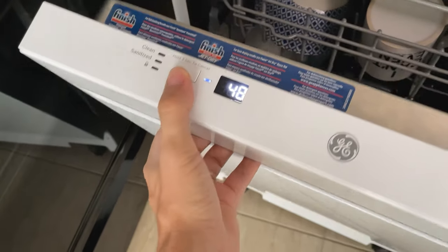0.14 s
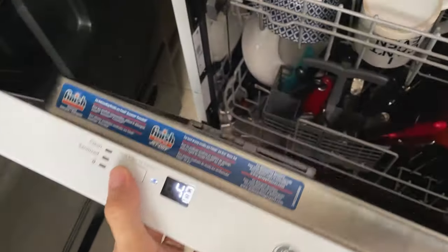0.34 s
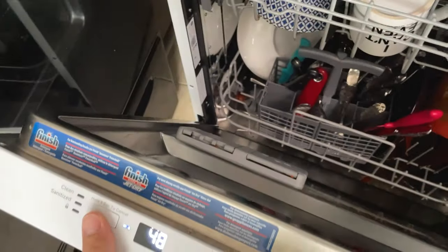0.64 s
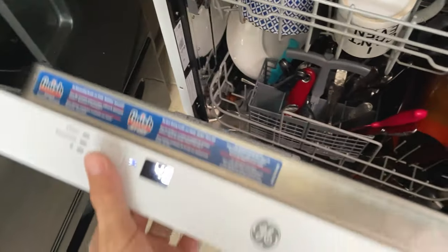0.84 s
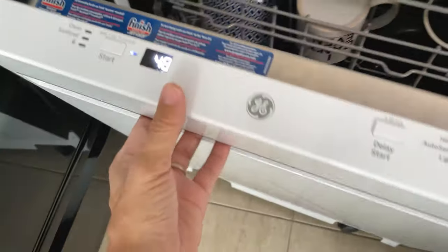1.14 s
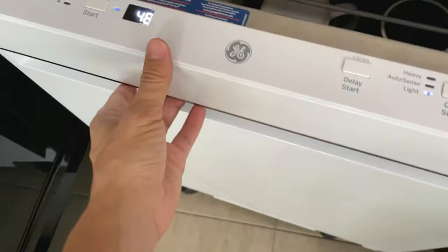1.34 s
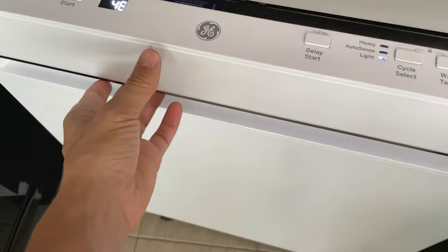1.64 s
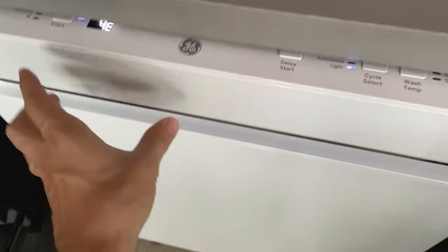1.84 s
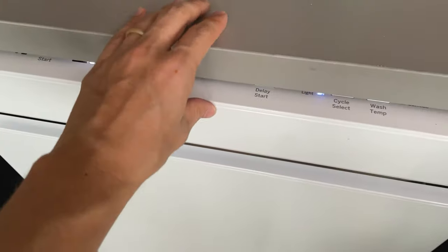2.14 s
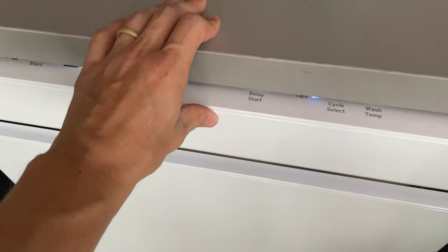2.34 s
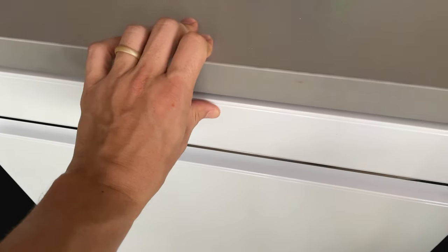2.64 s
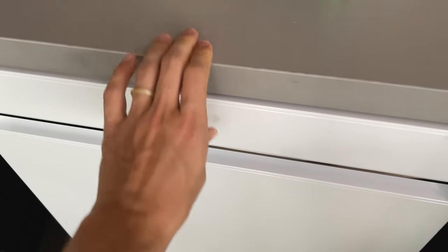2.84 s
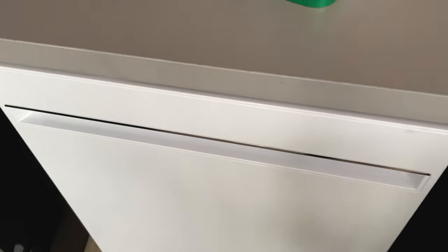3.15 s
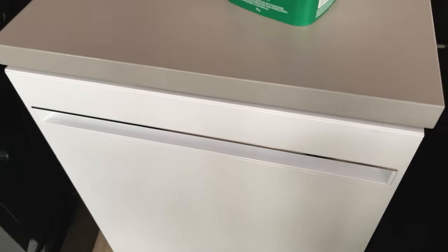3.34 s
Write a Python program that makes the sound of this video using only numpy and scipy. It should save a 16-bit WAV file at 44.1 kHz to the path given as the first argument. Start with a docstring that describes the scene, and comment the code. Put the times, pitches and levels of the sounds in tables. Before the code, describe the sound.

Loud thud and latch snap of a dishwasher door pushed shut, followed by three small clicks.

```python
"""A kitchen, close up on a dishwasher door being swung up and pushed shut.
Hinges and racks knock lightly, the springs groan, the door meets the tub and the seal squeaks.
Then the big hit: the latch snaps home, the steel panel rings and the whole cabinet rocks.
Three bright clicks follow. Under it all sits a bed of air, low rumble and appliance hum."""
import sys
import numpy as np
from scipy import signal
from scipy.fft import rfft, irfft
from scipy.io import wavfile
from scipy.ndimage import uniform_filter1d

SR = 44100
rng = np.random.default_rng(int(sys.argv[2]) if len(sys.argv) > 2 else 0)


def dump_mix(stems):
    """Bounce the given channels to the path in sys.argv[1] as a 16-bit WAV at rate SR."""
    frames = np.atleast_2d(stems).T  # one column per channel
    limited = np.clip(frames, -1, 1)  # hard clip at full scale
    pcm = np.round(limited * 32767).astype(np.int16)
    wavfile.write(sys.argv[1], SR, pcm)


N = 154350

# EQ curves of the room's air and low rumble (frequency [Hz], level [dB])
AIR_EQ = [(60, -3), (170, 1.5), (300, -7.5), (470, -4.5), (700, -13), (1000, -13.5), (1800, -27),
          (4000, -28), (10000, -26), (16000, -28)]
RUMBLE_EQ = [(10, -10), (27, 3.5), (40, 0.5), (55, -5.5), (72, -3), (95, -18.5), (130, -14.5), (170, -23.5),
             (300, -56.5)]
# appliance hum (frequency [Hz], level [dB])
HUM_TONES = [(73, -49.5), (131, -66)]
# hand and door brushing (centre time [s], half length [s], level [dB], band centre [Hz], width [octaves])
BRUSH_CUES = [(0.13, 0.052, -69.5, 3700, 0.96), (1.06, 0.11, -62, 9500, 1.1), (1.42, 0.056, -65, 3570, 2),
              (1.67, 0.11, -66, 4440, 1.7), (1.806, 0.023, -55.5, 6900, 4),
              (2.086, 0.033, -63.5, 9000, 2.5), (2.497, 0.018, -58.5, 9000, 0.76),
              (2.476, 0.085, -57, 790, 0.61), (3.18, 0.075, -55, 670, 0.4), (3.362, 0.11, -60, 9400, 6.5)]
# door knocks (time [s], crack level [dB], crack high cut [Hz], clatter level [dB])
KNOCK_CUES = [(0.214, -55.5, 3000, -51), (.441, -62, 2500, -51.5), (.597, -52.5, 2300, -48),
              (.674, -46.5, 10800, -58), (.909, -47, 7300, -46.5), (1.948, -34, 5200, -38),
              (2.152, -56, 3000, -53.5), (2.382, -62, 2990, -52.5), (2.42, -32, 5560, -37.5),
              (2.5521, -46, 11000, -47), (2.558, -29.5, 14000, -39.5), (2.5611, -17, 13600, -32),
              (2.5669, -24.5, 8500, -23)]
# EQ curves of a knock's two layers (frequency [Hz], level [dB])
CRACK_EQ = [(900, -6), (2000, -15), (2600, -4.5), (3300, 2), (4400, -3), (5600, 0.5), (7000, -3),
            (9200, 0.5), (12500, -5), (16000, -8.5)]
CLATTER_EQ = [(90, -19), (200, -4.5), (350, -1), (480, 2.5), (750, -6.5), (1150, -11), (1700, -20),
              (3000, -17), (8000, -72)]
# the kitchen's reverb tail (frequency [Hz], T60 [s])
REVERB_DECAY = [(150, 0.55), (600, 0.65), (3000, 0.47), (7000, 0.33), (13000, 0.16)]
# pitch curve of the hinge squeal (time [s], pitch [Hz])
SQUEAL_CURVE = [(.215, 6900), (.252, 7850), (.305, 7000), (.355, 7850), (.395, 7000)]
# rasping rubs (centre time [s], half length [s], level [dB], pitch [Hz])
RUB_CUES = [(0.332, 0.067, -67, 2150), (3.19, 0.066, -52, 560), (3.197, 0.015, -54.5, 3850)]
# heavy hits (time [s], cabinet level [dB], cabinet push [s], panel level [dB], panel contact [s])
THUD_CUES = [(1.950, -27, 0.012, -40.5, 0.0046), (1.9657, -44, .01, -36, 0.0026),
             (.911, -58, .01, -47, .003), (2.5594, -9, 0.0068, -22, 0.0026),
             (2.5745, -42, .005, -28, 0.0015)]
# modes of the cabinet, steel door panel and latch (frequency [Hz], relative level [dB], T60 [s])
CABINET_MODES = [(26.79, 3, 1.184), (45.6, 9.5, 0.13), (70.8, -1, 0.26), (113.1, -14.5, 0.64),
                 (130.1, -14, 0.45), (190.7, -24.5, 0.73), (217.6, -24.5, 0.46)]
PANEL_MODES = [(459, -9.5, 0.38), (475, 4.5, 0.063), (514, 2.5, 0.12), (640, -11.5, 0.18),
               (736, -22.5, 0.4), (938, -20.5, 0.3), (960, -32, 0.44), (1020, -37, 0.36), (1232, -13, 0.14)]
LATCH_MODES = [(3265, -2, .11), (3500, -6, .1), (4700, -11, 0.18), (5600, -9, 0.1), (6530, -3, .15),
               (8300, -6, 0.09), (9389, 13, 0.062)]
# harmonics 1-3 of the seal's squeak (level [dB])
SQUEAK_HARMONICS = [-57.5, -50, -50.5]
# clicks once the door is shut (time [s], level [dB], ring pitch [Hz])
CLICK_CUES = [(3.027, -37.5, 7100), (3.078, -37.5, 7600), (3.227, -39.5, 7660)]
# EQ curve of a click's snap (frequency [Hz], level [dB])
CLICK_EQ = [(1200, -12.5), (2500, -11), (3600, -15), (5200, -5.5), (6400, -11.5), (7700, 5), (8900, -4),
            (10000, 5), (11500, -0.5), (16000, -3)]
# modes of the clicking part (frequency [multiple of ring pitch], relative level [dB])
CLICK_PARTIALS = [(.39, -14.5), (.698, -14), (1., -0.5), (1.03, 0.5), (1.1, -2), (1.19, -9), (1.285, -3),
                  (1.326, 0), (1.63, -8), (1.71, -3)]

ATTACK_S, REVERB_BUILD_S = 0.00073, 0.004
GRAIN_DB = 2.5  # fast level flutter of brushes and rubs


def undb(db):
    """Decibels to gain."""
    return 10 ** (np.asarray(db) / 20)


def along(points, hz):
    """Read a (frequency [Hz], value) curve on a log-frequency axis."""
    corners, values = np.array(points, float).T
    return np.interp(np.log(hz), np.log(corners), values)


def freqs():
    """Frequencies of the spectrum bins, in Hz."""
    return np.maximum(np.arange(N // 2 + 1) * SR / N, 1)


def noise(eq_db):
    """Noise shaped by an EQ curve, at rms 1."""
    shaped = irfft(rfft(rng.standard_normal(N)) * undb(eq_db), N)
    return shaped / shaped.std()


def wobble(rate_hz):
    """Smooth random modulation with a spread of 1."""
    hold = int(SR / rate_hz)
    steps = np.repeat(rng.standard_normal(N // hold + 1), hold)
    smooth = uniform_filter1d(uniform_filter1d(steps, hold), hold)[:N]
    return smooth / smooth.std()


def ragged(hz, spacing_hz=90, spread_db=3):
    """EQ ripple in dB: the uneven strengths of an object's many small modes."""
    modes = np.arange(0, SR / 2, spacing_hz)
    return spread_db * np.interp(hz, modes, rng.standard_normal(len(modes)))


def tone(hz):
    """Sine oscillator following a pitch curve."""
    return np.sin(2 * np.pi * np.cumsum(hz) / SR)


def fade(age, t60):
    """Exponential decay, 60 dB down after t60 seconds."""
    return np.exp(-np.log(1000) * age / t60)


def swell(t, centre_s, half_s):
    """Bell-shaped envelope."""
    return np.exp(-((t - centre_s) / half_s) ** 2)


def burst(t, start, eq_db, t60, reverb_db):
    """Dense modes struck at once: a quick decay, then the kitchen's tail, shorter in the treble."""
    first = int(start * SR)
    age, out = t[:SR], np.zeros(N + SR)
    spectrum = rfft(noise(eq_db)[:SR])
    hz = np.maximum(np.arange(SR // 2 + 1), 1)
    attack = 1 - np.exp(-age / ATTACK_S)
    corners = [corner for corner, _ in REVERB_DECAY]
    for share, (_, reverb_t60) in zip(np.eye(len(corners)), REVERB_DECAY):
        band = irfft(spectrum * along(list(zip(corners, share)), hz), SR)
        tail = undb(reverb_db) * fade(age, reverb_t60) * (1 - np.exp(-age / REVERB_BUILD_S))
        out[first:first + SR] += band * np.hypot(fade(age, t60), tail) * attack
    return out[:N]


def ring(t, start, modes, contact_s):
    """Modes pushed inward over the contact time and left to ring."""
    age = np.maximum(t - start, 0)
    attack = 1 - np.exp(-(age / contact_s) ** 2)
    return -attack * sum(undb(db) * np.sin(2 * np.pi * hz * age) * fade(age, t60)
                         for hz, db, t60 in modes)


def room(drift_hz=3.064):
    """The bed: steady air, a low rumble and a wavering appliance hum."""
    air = undb(-59) * noise(along(AIR_EQ, freqs()))
    rumble = undb(-41) * noise(along(RUMBLE_EQ, freqs()))
    hum = sum(undb(db) * tone(hz + drift_hz * wobble(20)) for hz, db in HUM_TONES)
    return air + rumble + hum


def brushes(t):
    """Hand and door slide lightly: soft swells of grainy noise."""
    hz, out = freqs(), 0
    grain = undb(GRAIN_DB * wobble(900) + 2 * wobble(70))
    for centre_s, half_s, db, band_hz, octaves in BRUSH_CUES:
        band_db = -20 * np.log10(1 + (np.log2(hz / band_hz) / octaves) ** 2)
        out += undb(db) * swell(t, centre_s, half_s) * noise(band_db + ragged(hz))
    return grain * out


def knocks(t):
    """Each contact layers a hard crack of plastic and steel over a low clatter of the door."""
    hz, out = freqs(), 0
    crack_eq = along(CRACK_EQ, hz) + ragged(hz)
    clatter_eq = along(CLATTER_EQ, hz)
    for start, crack_db, cutoff_hz, clatter_db in KNOCK_CUES:
        high_cut_db = -10 * np.log10(1 + (hz / cutoff_hz) ** 4)
        out += undb(crack_db) * burst(t, start, crack_eq + high_cut_db, t60=0.037, reverb_db=-17.5)
        out += undb(clatter_db) * burst(t, start, clatter_eq, t60=0.12, reverb_db=-8.5)
    return out


def hinges(t, groan_s=0.533, rise_hz_per_s=14.06):
    """The hinges work as the door swings: a faint low groan from the springs and a thin squeal."""
    groan_hz = 133.1 + rise_hz_per_s * (t - groan_s) + 1.04 * wobble(16.8)
    groan = undb(-49.5) * swell(t, groan_s, half_s=0.32) * tone(groan_hz)
    squeal_hz = np.interp(t, *np.array(SQUEAL_CURVE).T) + 90 * wobble(700)
    squeal_db = -74.5 + 4 * wobble(300)
    squeal = undb(squeal_db) * swell(t, centre_s=0.31, half_s=0.13) * tone(squeal_hz)
    return groan + squeal


def rubs(t, jitter=0.13):
    """Uneven stick and slip gives short, raspy tones."""
    out = 0
    for centre_s, half_s, db, hz in RUB_CUES:
        envelope = undb(db + GRAIN_DB * wobble(200)) * swell(t, centre_s, half_s)
        out += envelope * tone(hz * (1 + jitter * wobble(2500)))
    return out


def thuds(t, lag_s=0.0043):
    """The weight of the door: the struck panel rings, and a moment later the cabinet rocks and booms."""
    out = 0
    for start, cabinet_db, push_s, panel_db, contact_s in THUD_CUES:
        out += undb(panel_db) * ring(t, start, PANEL_MODES, contact_s)
        out += undb(cabinet_db) * ring(t, start + lag_s, CABINET_MODES, push_s)
    return out


def seal_squeak(t, jitter=0.004):
    """The seal sticks and slips as it is squeezed: one short chirp."""
    pitch_hz = 1706 * (1 + jitter * wobble(600))
    harmonics = sum(undb(db) * tone(k * pitch_hz) for k, db in enumerate(SQUEAK_HARMONICS, 1))
    return swell(t, centre_s=2.499, half_s=0.012) * harmonics


def latch(t, start_s=2.5615):
    """The steel latch snaps home with a bright ring."""
    return undb(-40) * ring(t, start_s, LATCH_MODES, ATTACK_S)


def clicks(t, ping_db=-5.5):
    """A small hard part snaps and pings briefly in the treble."""
    hz, out = freqs(), 0
    snap_eq = along(CLICK_EQ, hz) + ragged(hz)
    for start, db, pitch_hz in CLICK_CUES:
        snap = burst(t, start, snap_eq, t60=0.063, reverb_db=-4.5)
        modes = [(pitch_hz * ratio, mode_db, 0.1) for ratio, mode_db in CLICK_PARTIALS]  # T60 0.1 s
        ping = undb(ping_db) * ring(t, start, modes, ATTACK_S)
        out += undb(db) * (snap + ping)
    return out


def scene():
    """The mono mix: room bed, impacts and friction."""
    t = np.arange(N) / SR
    bed = room()
    impacts = knocks(t) + thuds(t) + latch(t) + clicks(t)
    friction = seal_squeak(t) + rubs(t) + hinges(t) + brushes(t)
    return (bed + impacts + friction)[None]


def record(dry, cutoff_hz=15800):
    """A steep high cut trims the very top of the mix."""
    return signal.sosfilt(signal.ellip(10, 0.2, 80, cutoff_hz, fs=SR, output="sos"), dry)


dry = scene()
out = record(dry)
dump_mix(out)
```